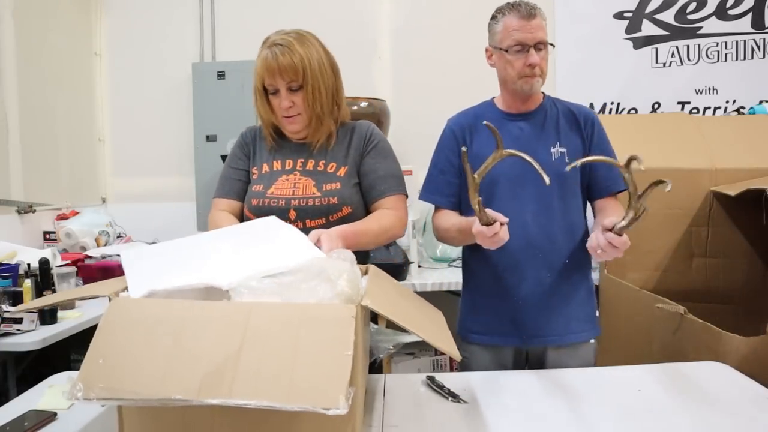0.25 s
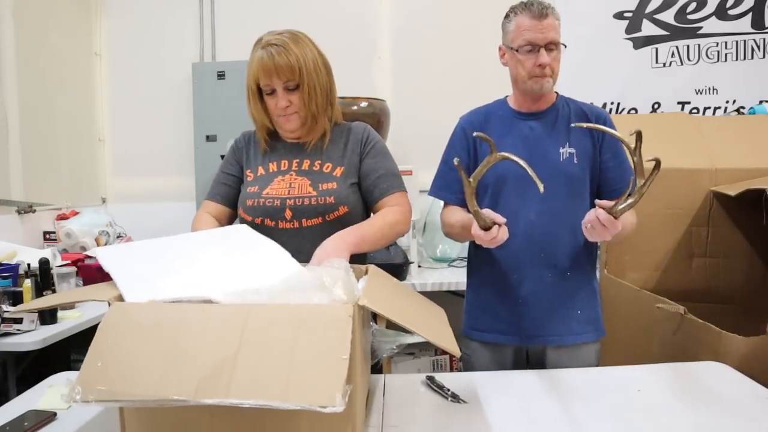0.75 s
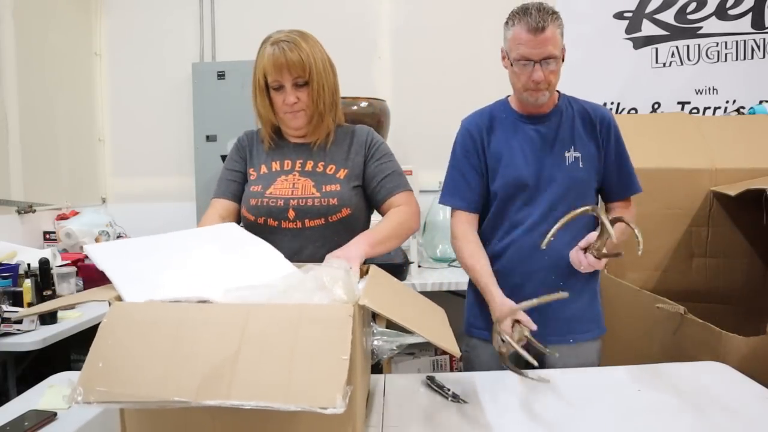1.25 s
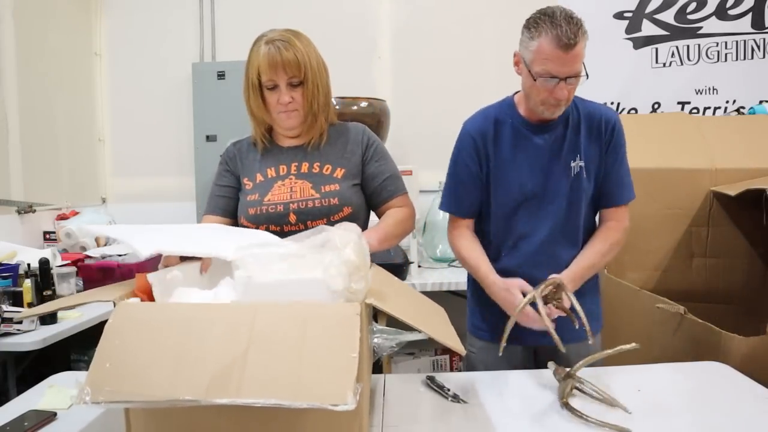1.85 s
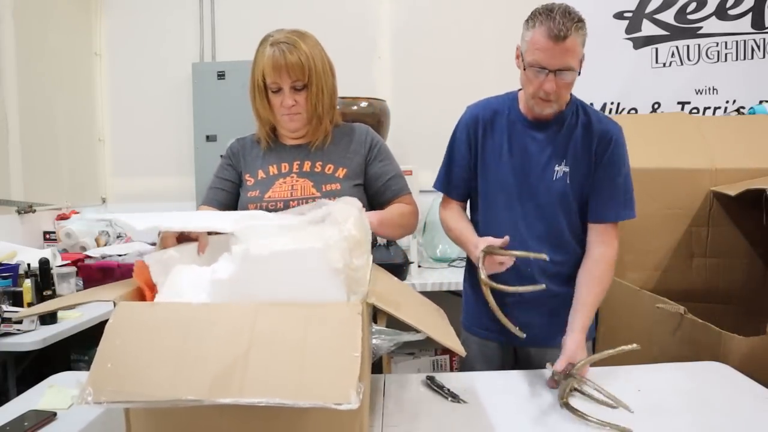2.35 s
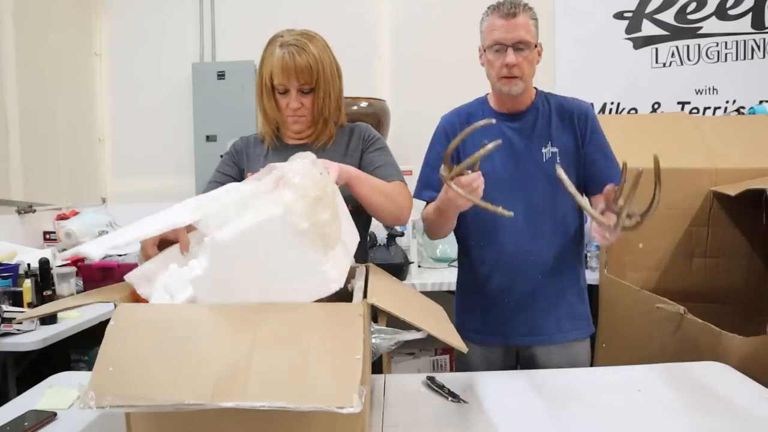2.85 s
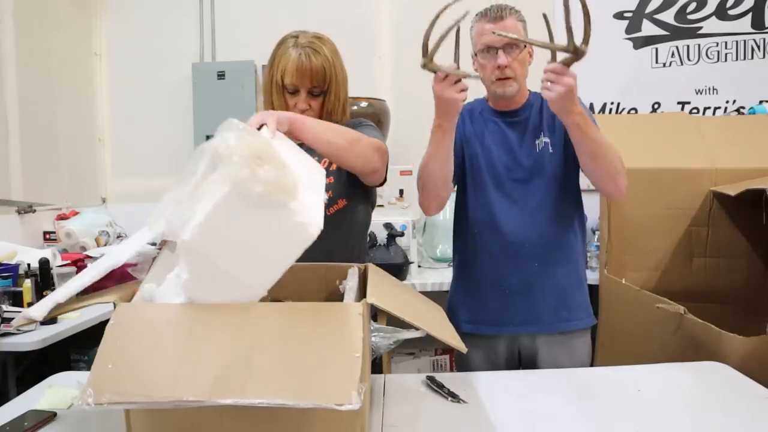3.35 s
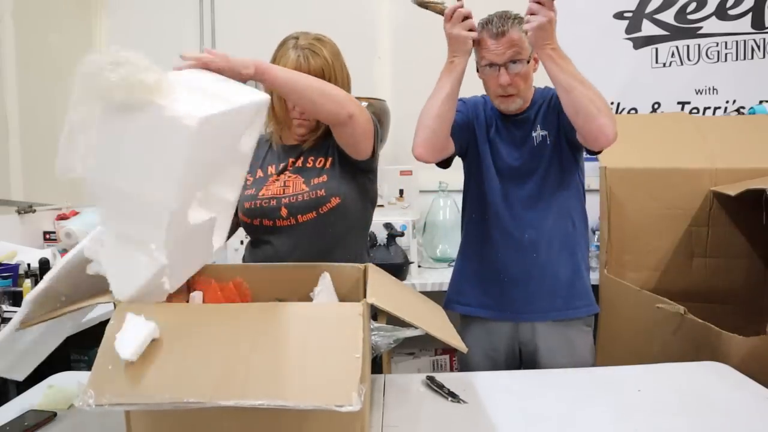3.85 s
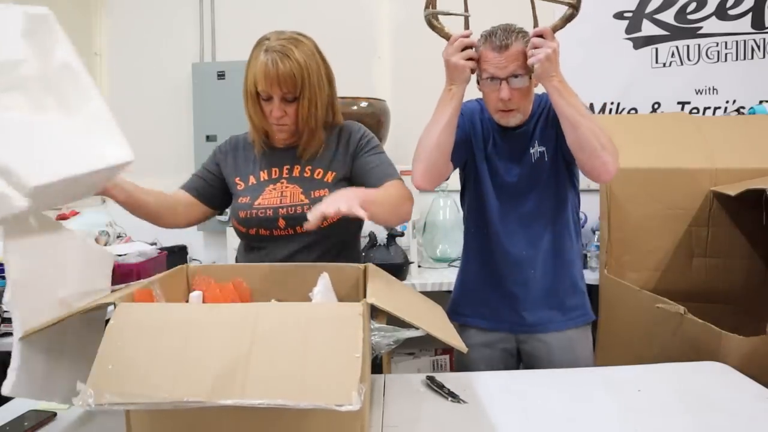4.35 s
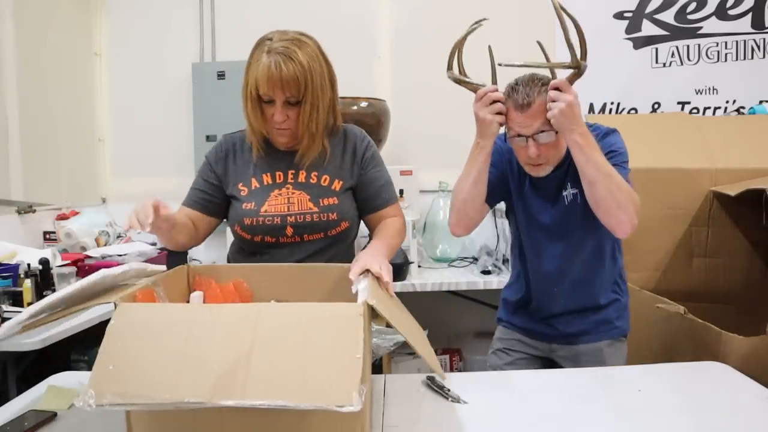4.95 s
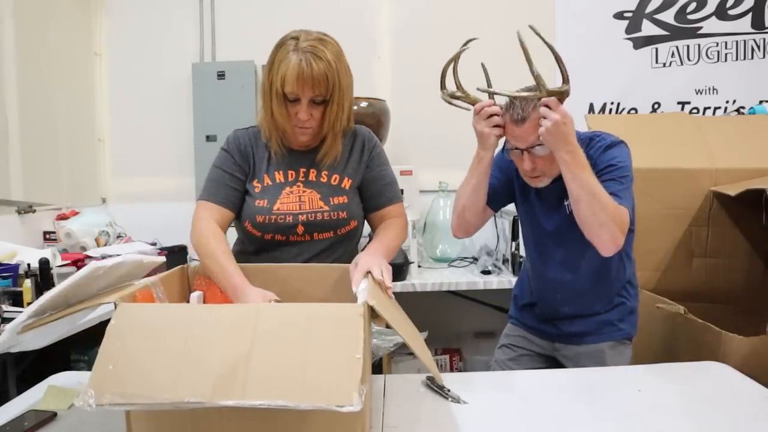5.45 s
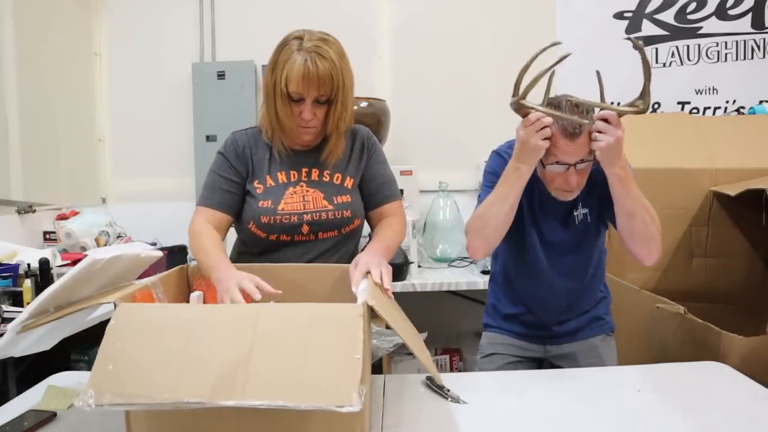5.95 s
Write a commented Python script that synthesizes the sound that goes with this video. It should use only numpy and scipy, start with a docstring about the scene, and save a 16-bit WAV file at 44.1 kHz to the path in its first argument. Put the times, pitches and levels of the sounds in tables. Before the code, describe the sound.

Foam packing is pulled from a cardboard box in a fairly dry indoor space. Crackly rubbing strokes shake the box walls, with dull bumps and crisp snaps. A bending squeak comes near two seconds, then the loudest squeals shortly after. Snaps crowd in around four seconds before the movement thins. Close microphones; the left side is muffled, bassy and hissy, the right clear and bright.

```python
"""Packing foam is dragged out of a cardboard box in a fairly dry room, over still air and a trembling table.
From the start, slips rub and crackle in strokes and shake the box walls; snaps, bumps and shoves break in.
Near 2 s a bending squeak and short squeals sound; near 2.6 s come the loudest squeals.
From 3.9 s snaps crowd the strokes, which thin out towards 6 s.
The left microphone port is nearly blocked: it hears mostly bass and adds its own hiss."""
import sys
import numpy as np
from scipy import signal
from scipy.io import wavfile
from scipy.ndimage import uniform_filter1d

SR = 44100
rng = np.random.default_rng(int(sys.argv[2]) if len(sys.argv) > 2 else 0)


def output_pcm(signal):
    """Save a mono or channel-first signal as 16-bit PCM at the path in sys.argv[1].

    Samples are clipped to [-1, 1] before scaling.
    """
    pcm = np.clip(np.atleast_2d(signal).T, -1, 1) * 32767
    wavfile.write(sys.argv[1], SR, np.round(pcm).astype(np.int16))


def amplitude_ratio(level_db):
    """Convert a level in decibels to the matching linear amplitude (field) ratio."""
    exponent = np.asarray(level_db, float) / 20
    return 10 ** exponent


N = 273684


def rms_one(x):
    """Scale to rms 1."""
    return x / np.sqrt(np.mean(x ** 2) + 1e-20)


def in_time(rows, time_s):
    """Columns of a curve, interpolated at the given times."""
    at_s, *columns = np.transpose(rows)
    return [np.interp(time_s, at_s, column) for column in columns]


def drift(rate_hz, size):
    """Slow chance: noise twice through a one-pole low-pass; rms 1."""
    pole = np.exp(-2 * np.pi * rate_hz / SR)
    lead = SR // 4
    noise = rng.standard_normal(size + lead)
    slow = signal.lfilter([1], [1, -2 * pole, pole * pole], noise)
    return rms_one(slow[lead:])


def low_pass(x, order, hz):
    """Butterworth low-pass."""
    return signal.sosfilt(signal.butter(order, hz, fs=SR, output="sos"), x)


def coloured(sources, spectrum, patchy_db, per_octave=3):
    """Bands fed in turn by two sources, each with its own level and flicker; rms 1."""
    hz, db = np.transpose(spectrum)
    count = round(per_octave * np.log2(hz[-1] / hz[0]))
    edges_hz = np.geomspace(hz[0], hz[-1], count + 1)
    out = 0
    for k, (low, high) in enumerate(zip(edges_hz, edges_hz[1:])):
        band_pass = signal.butter(2, [low, high], "band", fs=SR, output="sos")
        band = signal.sosfilt(band_pass, sources[k % 2])
        # 14 Hz drift, drawn once per 32 samples
        flicker = np.repeat(drift(14 * 32, N // 32 + 1), 32)[:N]
        level_db = np.interp(np.log(low * high) / 2, np.log(hz), db)
        out = out + band * amplitude_ratio(level_db + patchy_db * flicker)
    return rms_one(out)


def coloured_noise(spectrum, patchy_db):
    """Steady noise in two bands an octave; rms 1."""
    return coloured(rng.standard_normal((2, N)), spectrum, patchy_db, per_octave=2)


def swells(at_s, rise_s, fall_s, db):
    """Movements that climb to a peak and die down at steady dB rates; their powers add."""
    drop_db = 12   # gained in a rise time, lost in a fall time
    t = np.arange(0, N + 64, 64)[:, None] / SR - at_s
    away = np.maximum(-t / np.maximum(rise_s, .003), t / np.maximum(fall_s, .003))
    level = np.sqrt(np.sum(amplitude_ratio(db - drop_db * away) ** 2, axis=1))
    return np.interp(np.arange(N) / 64, np.arange(len(t)), level)


def slips(per_s, spread_db, clump_db):
    """Two trains of tiny slips of uneven size that bunch together."""
    chance = per_s * amplitude_ratio(clump_db * drift(40, N)) / SR
    born = rng.random((2, N)) < chance
    size = amplitude_ratio(spread_db * np.minimum(rng.exponential(1, (2, N)), 5))
    return born * size * rng.choice([-1, 1], (2, N)) + 1e-18


def creaks(low_hz, high_hz, per_s, cycles, count=18):
    """Larger slips each ring one small patch, losing 60 dB in the given cycles; rms 1."""
    clicks = slips(per_s, spread_db=5.0, clump_db=4.5)[0]
    patch = rng.integers(0, count, N)
    out = 0
    for k, hz in enumerate(np.geomspace(low_hz, high_hz, count)):
        radius, angle = amplitude_ratio(-60 * hz / (cycles * SR)), 2 * np.pi * hz / SR
        ring = [1, -2 * radius * np.cos(angle), radius * radius]
        out = out + signal.lfilter([0, np.sin(angle)], ring, clicks * (patch == k) + 1e-18)
    return rms_one(out)


def squeal(hz, rough, octave_db, waver=0.048):
    """Regular slips give a tone and its octave; roughness shakes their pitch and strength."""
    rough = np.clip(rough, 0, 1)
    shaken_hz = hz * (1 + waver * rough * drift(245, len(hz)))
    phase = 2 * np.pi * np.cumsum(shaken_hz) / SR
    grip = [1 - rough ** 2 / 2 + rough * drift(200, len(hz)) for partial in (1, 2)]
    tone = grip[0] * np.sin(phase)
    octave = amplitude_ratio(octave_db) * grip[1] * np.sin(2 * phase)
    return np.sqrt(2) * (tone + octave)


def knocks(events, t60_s, law, rise_s, crack_db):
    """Sharp contacts with dying noise bursts; t60 is given at 300 Hz and goes as pitch to the law."""
    out, t = np.zeros(N + SR), np.arange(SR // 4) / SR
    noise = rng.standard_normal((len(events), len(t)))
    for (at_s, db, hz, octaves), puff in zip(events, noise):
        decay = amplitude_ratio(-60 * t / (t60_s * (hz / 300) ** law))
        puff = puff * (1 - np.exp(-t / rise_s)) * decay
        puff[0] = amplitude_ratio(crack_db) * np.sqrt(SR / hz)   # as strong in its band whatever the pitch
        edges_hz = hz * 2 ** (max(octaves, .1) * np.array([-.5, .5]))
        edges_hz = np.minimum(edges_hz, .45 * SR)
        burst = signal.sosfilt(signal.butter(2, edges_hz, "band", fs=SR, output="sos"), puff)
        out[round(at_s * SR):][:len(t)] += amplitude_ratio(db) * burst / np.abs(burst).max()
    return out[:N]


def still_air():
    """Steady faint noise, the same at both ports."""
    # still room and capsule noise: (frequency [Hz], relative level per Hz [dB])
    air_spectrum = [(15, -32), (25, 6.5), (44, -18), (200, -4), (637, -4), (955, -11), (1280, -19.5),
                    (1680, -3.5), (2260, -6), (5980, -6), (14600, -14.5), (15800, -27)]
    return amplitude_ratio(-64) * coloured_noise(air_spectrum, patchy_db=.7)


def table_boom():
    """Low noise of box and table: shoves swell it, and it never rests completely."""
    # boom: (frequency [Hz], relative level per Hz [dB])
    boom_spectrum = [(40, -9), (75, 4), (130, -5.5), (220, 0)]
    # box and table shoved as a whole: (time of peak [s], rise [s], fall [s], level before mic gain [dB])
    shoves = [(.55, .05, 0.13, -67), (1.55, 0.018, 0.11, -60), (1.71, 0.11, 0.12, -52.5),
              (2.11, 0.086, 0.087, -84), (2.5, 0.068, 0.11, -58.5), (2.79, 0.044, 0.12, -57.5),
              (5.2, 0.072, .05, -63), (5.35, 0.05, 0.14, -62.5)]
    tremble_db = -73
    return (amplitude_ratio(tremble_db) + swells(*np.transpose(shoves))) * coloured_noise(boom_spectrum, patchy_db=1.5)


def bumps():
    """Bumps against the box; higher ones die sooner."""
    # (time [s], peak before mic gain [dB], centre [Hz], width [octaves])
    bump_events = [(0.075, -48.5, 231, 0.27), (0.1, -52, 232, 0.27), (0.532, -49, 126, 1),
                   (1.545, -30, 714, 2.6), (1.549, -45, 140, 1.7), (1.681, -41.5, 152, 0.24),
                   (1.846, -26.5, 1110, 1.1), (2.101, -23, 356, 1.7), (2.301, -48.5, 179, 0.53),
                   (2.425, -48.5, 166, 0.34), (2.481, -45.5, 130, 2), (2.612, -29, 650, 1.8),
                   (2.779, -37.5, 143, 2.3), (3.132, -30, 720, 0.8), (3.136, -42, 277, 0.3),
                   (3.393, -36.5, 414, .9), (3.497, -27.5, 910, 1.6), (3.577, -38.5, 390, 0.24),
                   (3.733, -43, 530, 0.33), (4.512, -55, 610, 1.8), (4.775, -50, 303, 0.62),
                   (5.078, -33, 295, 1.4), (5.184, -28, 384, 2.1), (5.195, -28, 300, 1.43),
                   (5.34, -34, 500, 1.64), (5.343, -37, 216, 0.58), (5.374, -40, 443, 0.45),
                   (5.953, -38.5, 1060, 1.3)]
    return knocks(bump_events, t60_s=0.15, law=-0.57, rise_s=0.00073, crack_db=8)


def snaps():
    """Foam snapping: bursts that all die at the same rate."""
    # (time [s], peak before mic gain [dB], centre [Hz], width [octaves])
    snap_events = [(0.185, -28, 4430, 1.3), (0.3485, -38, 3550, 1.7), (0.9592, -37, 4640, 0.74),
                   (1.492, -33, 2010, 0.81), (1.5439, -23, 1830, 2.7), (1.597, -31, 5300, 0.61),
                   (1.8452, -26.5, 1850, 1.15), (2.3026, -31, 3180, 0.99), (2.4775, -46, 2170, 1.9),
                   (2.8719, -24, 4410, 1.7), (3.8776, -20, 3440, 2.6), (3.9569, -18, 3200, 1.76),
                   (3.9985, -33, 3540, 2.1), (4.0265, -37, 5420, 0.73), (4.118, -29.5, 5160, .9),
                   (4.2023, -30.5, 2900, 2.1), (4.2308, -23, 4900, 0.85), (4.4694, -20, 7500, 0.66),
                   (4.612, -44, 6550, 1.2), (4.671, -34, 5470, 1.1), (4.712, -34, 6430, .8),
                   (4.779, -29.5, 2150, 3.9), (5.003, -39.5, 6000, 0.38), (5.1854, -32, 2310, 1),
                   (5.1946, -27.5, 4800, 1.3), (5.5912, -34.5, 5260, 0.93), (5.9533, -35.5, 2310, 1.3)]
    return knocks(snap_events, t60_s=0.028, law=0, rise_s=0.0001, crack_db=4.5)


def squeaks():
    """Stick-slip tones: one bending squeak and several straight glides."""
    # block twisting free: (time [s], pitch [Hz], tone before mic gain [dB])
    bend = [(2.035, 1435, -36), (2.043, 1398, -31.5), (2.053, 1630, -34), (2.073, 1643, -29),
            (2.105, 1594, -26), (2.117, 1990, -26.5), (2.123, 2005, -21), (2.129, 2190, -36),
            (2.135, 2120, -31)]
    # squeals of separate patches: (start [s], length [s], first pitch [Hz], last pitch [Hz],
    # starting tone before mic gain [dB], roughness [0-1])
    glides = [(1.94, 0.087, 1960, 2130, -38.5, 0.64), (2.015, 0.0224, 1720, 1970, -35.5, .5),
              (2.124, 0.033, 2680, 2920, -27, 0.4), (2.128, 0.034, 2030, 2180, -36.5, 0.4),
              (2.566, 0.032, 2390, 2460, -34, 0.6), (2.578, 0.036, 2050, 2230, -23, 0.35),
              (2.61, .062, 2210, 2340, -11, 0.21), (2.588, 0.098, 3300, 3160, -28, 0.56),
              (2.595, 0.026, 3630, 3600, -35.5, 0.3), (2.608, 0.014, 4030, 3850, -18, 0.3),
              (2.585, 0.031, 4830, 4540, -34.5, 0.65), (2.645, 0.033, 4050, 4400, -25.5, 0.4),
              (2.664, 0.028, 3750, 3780, -19.5, 0.3)]
    rise_s, fall_s = 0.0063, .006
    growth_db = 4.5   # the grip tightens along a squeal
    out = np.zeros(N)
    at = np.arange(round(bend[0][0] * SR), round(bend[-1][0] * SR))
    hz, tone_db = in_time(bend, at / SR)
    out[at] += amplitude_ratio(tone_db) * squeal(hz, rough=0.167, octave_db=-0.5)
    for start_s, length_s, first_hz, last_hz, db, rough in glides:
        t = np.arange(round(length_s * SR)) / SR
        fade = np.clip(np.minimum(t / rise_s, (length_s - t) / fall_s), 0, 1)
        level = amplitude_ratio(db + growth_db * t / length_s) * fade
        tone = squeal(np.linspace(first_hz, last_hz, len(t)), rough, octave_db=-25)
        out[round(start_s * SR):][:len(t)] += level * tone
    return out


def coarse_rub(beads):
    """Bead slips and ringing foam patches give the mid rub."""
    # rub: (frequency [Hz], relative level per Hz [dB])
    rub_spectrum = [(500, -53), (800, -23), (1700, -2.5), (2300, -2.5), (3200, -2), (4500, 1.5), (6500, -6),
                    (9500, -49)]
    rub = coloured(beads, rub_spectrum, patchy_db=2.5)
    rub = rub + amplitude_ratio(-11.5) * creaks(1414, 9340, per_s=1500, cycles=63)
    return low_pass(rub, 4, 8800)


def fine_crackle(beads):
    """Bead slips give a crackle whose finest part gains further with brightness."""
    # crackle: (frequency [Hz], relative level per Hz [dB])
    crackle_spectrum = [(3500, 3), (6000, 11.5), (7500, -0.5), (9500, 5.5), (10800, -11.5), (12500, -28),
                        (15500, -48.5)]
    # brightness: (time [s], crackle gain over rub [dB])
    brightness = [(0, -3.5), (.3, -5), (.48, 1), (.6, -7.5), (.85, 3), (1.2, -2.5), (1.4, -5.5),
                  (2.0, -8.5), (2.15, 1.5), (2.4, -8), (2.65, -3), (2.75, -2), (3.1, -4), (3.2, 3),
                  (3.45, -3), (3.9, 2.5), (4.2, 3.5), (4.35, -1), (4.46, 7), (4.6, 1.5), (4.8, 1.5),
                  (5.1, 1), (5.3, 6.5), (5.5, -4), (6.2, 3)]
    finest_db, finest_db_per_db = -1, 1.4
    bright_db, = in_time(brightness, np.arange(N) / SR)
    crackle = coloured(beads, crackle_spectrum, patchy_db=2.0)
    finest = signal.sosfilt(signal.butter(4, 11880, "high", fs=SR, output="sos"), crackle)
    crackle = low_pass(crackle, 4, 11300)
    return amplitude_ratio(bright_db) * (crackle + amplitude_ratio(finest_db + finest_db_per_db * bright_db) * finest)


def box_wall():
    """Coarser slips and low creaks shake the box wall."""
    # wall: (frequency [Hz], relative level per Hz [dB])
    wall_spectrum = [(110, -28), (170, -9), (300, 3), (600, 2), (1100, 4.5), (2200, -10.5)]
    coarse = slips(2500, spread_db=2.0, clump_db=2.5)
    wall = coloured(coarse, wall_spectrum, patchy_db=2.5, per_octave=2)
    return wall + amplitude_ratio(-17) * creaks(227.3, 990, per_s=250, cycles=36, count=10)


def dragging():
    """Strokes swell the rub and crackle, made by the same slips, and the box wall."""
    # (time of peak [s], rise [s], fall [s], rubbing gain [dB], box wall gain [dB])
    strokes = [(0.01, 0.13, 0.37, -42, -50), (.25, 0.1, 0.0073, -42.5, -47.5),
               (.44, 0.014, 0.019, -58, -78.5), (.475, 0.045, 0.022, -53, -56),
               (.59, 0.059, 0.19, -44, -48), (0.657, 0.086, 0.037, -35, -48.5),
               (.84, 0.026, 0.02, -45.5, -53.5), (0.999, 0.22, 0.088, -50.5, -54.5),
               (1.125, 0.065, 0.21, -51, -57), (1.24, 0.043, 0.019, -52, -60),
               (1.39, 0.12, 0.5, -59, -54.5), (1.51, 0.16, 0.12, -38, -54.5),
               (1.549, 0.0092, 0.058, -41, -37.5), (1.63, .1, 0.22, -41, -63),
               (1.714, 0.1, 0.061, -36, -39), (1.83, 0.042, 0.18, -42.5, -44.5),
               (1.99, 0.14, 0.12, -39, -49), (2.07, 0.04, .1, -26, -54), (2.123, 0.12, 0.04, -28, -43.5),
               (2.2, .04, 0.14, -43, -75), (2.305, .02, 0.18, -46, -50.5), (2.4, .1, 0.038, -45, -47),
               (2.49, 0.07, .1, -76, -48), (2.54, 0.025, 0.087, -66, -50),
               (2.598, 0.023, 0.25, -25.5, -44.5), (2.675, 0.075, .025, -22, -62),
               (2.72, 0.048, 0.2, -33, -42), (2.8, 0.029, 0.056, -42, -42), (2.9, 0.036, 0.14, -44, -51.5),
               (3.14, 0.22, 0.059, -49, -51.5), (3.2, 0.06, 0.81, -48.5, -53.5),
               (3.361, 0.016, .3, -45.5, -43.5), (3.42, 0.088, 0.15, -45.5, -47.5),
               (3.51, 0.065, 0.094, -54, -40.5), (3.61, 0.12, 0.056, -40, -47.5),
               (3.758, 0.1, 0.091, -42, -50.5), (3.85, 0.017, .02, -51.5, -55),
               (3.9, 0.073, 0.055, -47.5, -55), (3.965, .015, 0.14, -50.5, -52.5),
               (4.13, 0.11, 0.14, -50.5, -62), (4.23, 0.028, 0.23, -47.5, -50.5),
               (4.34, 0.082, 0.1, -34, -44.5), (4.43, 0.061, .07, -39, -47.5), (4.47, .05, .02, -54, -61),
               (4.52, .05, 0.026, -39, -46), (4.608, 0.13, 0.038, -45, -54.5),
               (4.77, 0.22, 0.29, -52.5, -54), (5.01, 0.0098, 0.2, -56, -72),
               (5.083, 0.005, 0.07, -44.5, -45), (5.15, 0.12, 0.055, -48.5, -51),
               (5.202, 0.013, 0.04, -40, -47), (5.31, .05, 0.065, -49, -62), (5.37, 0.1, 0.6, -54, -58),
               (5.595, .01, 0.2, -55.5, -72), (5.7, .1, .02, -69.5, -60), (5.738, 0.015, 0.058, -49.5, -54),
               (6.0, 0.81, .5, -68, -63)]
    *shape, rub_db, wall_db = np.transpose(strokes)
    beads = slips(9000, spread_db=1.0, clump_db=2.5)
    rubbing = coarse_rub(beads) + fine_crackle(beads)
    return swells(*shape, rub_db) * rubbing + swells(*shape, wall_db) * box_wall()


def room(x):
    """A faint late wash of reflections that dies away quickly."""
    t60_s, gap_s, wall_cut_hz, wash_db = 0.28, 0.03, 14000, -19.5
    t = np.arange(SR) / SR
    tail = rng.standard_normal(SR) * amplitude_ratio(-60 * t / t60_s) * (t > gap_s)
    tail = signal.lfilter(*signal.butter(1, wall_cut_hz, fs=SR), tail)
    tail = tail / np.sqrt(np.sum(tail ** 2))
    return amplitude_ratio(wash_db) * signal.fftconvolve(x, tail)[:N]


def scene():
    """Both ports hear the same direct sound and still air, but reflections of their own."""
    foam = table_boom() + bumps() + snaps() + squeaks() + dragging()
    return foam + still_air() + np.array([room(foam), room(foam)])


def blocked_port(x):
    """Damped cavity resonance with a leak, then a steeper treble cut; the capsule adds hiss."""
    # left capsule: (frequency [Hz], relative level per Hz [dB])
    hiss_spectrum = [(40, -18.5), (150, -3.5), (600, 2.5), (1500, -3), (3000, -6.5), (7000, -8),
                     (10000, -9.5), (15800, -7)]
    port_hz, port_q, leak_hz, top_hz = 150, .75, 138, 7000
    w, leak = 2 * np.pi * port_hz, 2 * np.pi * leak_hz
    # the leak eases the fall to 6 dB an octave
    cavity = signal.bilinear([1 / leak, 1], [1 / w ** 2, 1 / (w * port_q), 1], fs=SR)
    x = signal.lfilter(*cavity, x)
    x = signal.lfilter(*signal.butter(2, top_hz, fs=SR), x)
    return x + amplitude_ratio(-57) * coloured_noise(hiss_spectrum, patchy_db=1.6)


def limiter(left, right):
    """Peaks on the right duck both sides, which recover at a steady dB rate."""
    limit_db, release_db_per_s = -1.5, 8
    ramp_db = release_db_per_s * np.arange(N) / SR
    over_db = np.maximum(20 * np.log10(np.abs(right) + 1e-9) - limit_db, 0)
    held_db = np.maximum.accumulate(over_db + ramp_db) - ramp_db
    duck_db = uniform_filter1d(held_db, size=129)
    return np.array([left, right]) * amplitude_ratio(-duck_db)


def roll_off(x):
    """The treble ends steeply here."""
    return signal.sosfilt(signal.butter(12, 15830, fs=SR, output="sos"), x)


def record(dry):
    """Microphone gain, the blocked left port, then the limiter."""
    mic_gain_db = 5
    left, right = amplitude_ratio(mic_gain_db) * dry
    mix = limiter(blocked_port(left), right)
    return roll_off(mix)


dry = scene()
out = record(dry)
output_pcm(out)
```